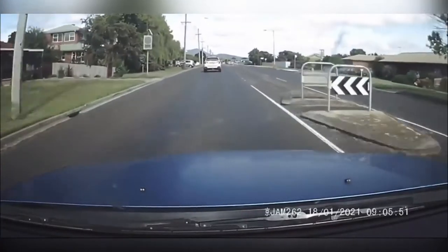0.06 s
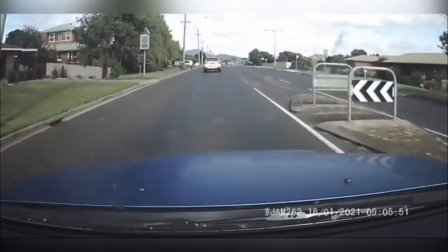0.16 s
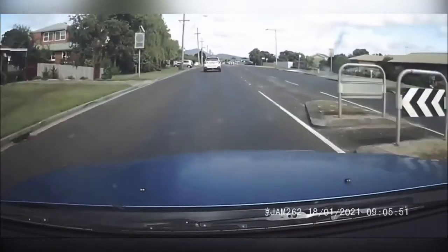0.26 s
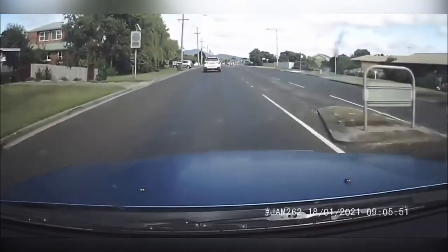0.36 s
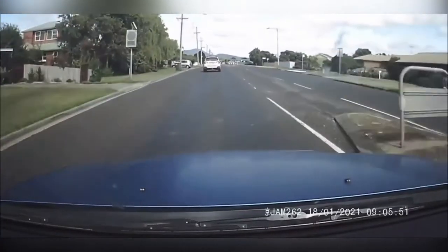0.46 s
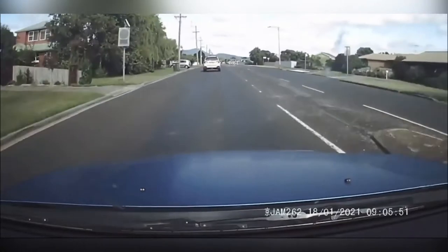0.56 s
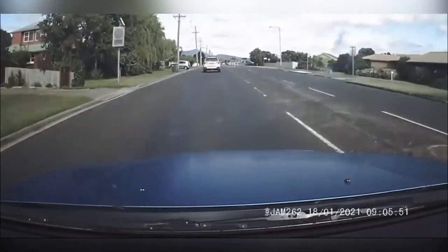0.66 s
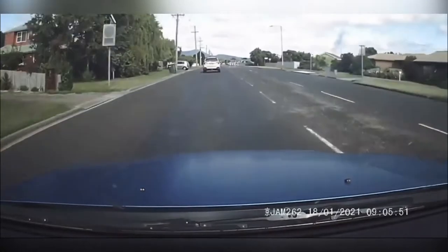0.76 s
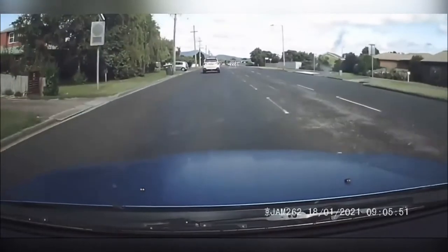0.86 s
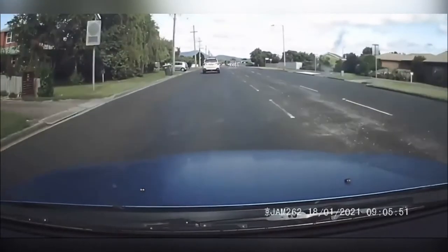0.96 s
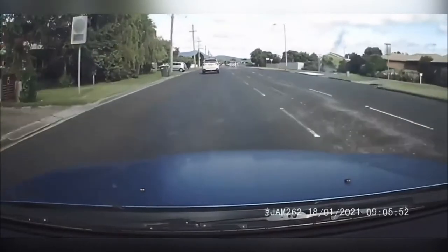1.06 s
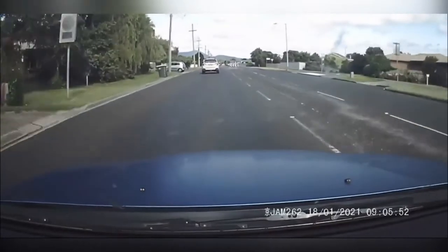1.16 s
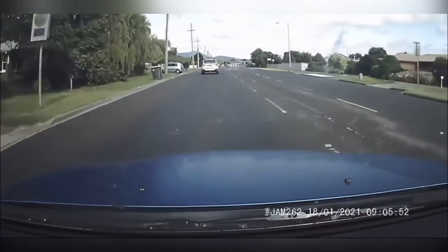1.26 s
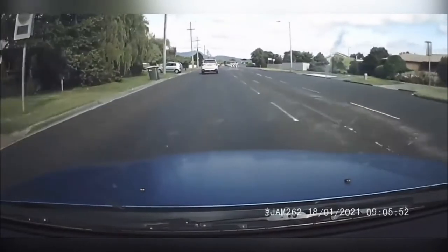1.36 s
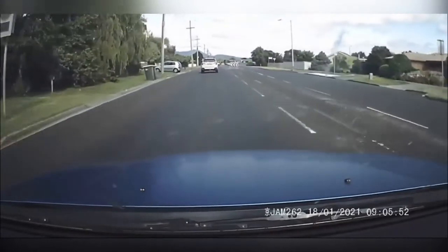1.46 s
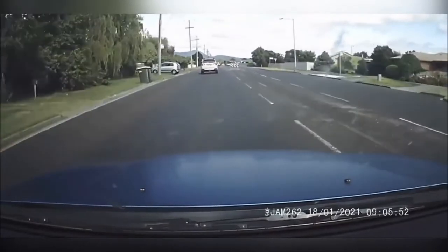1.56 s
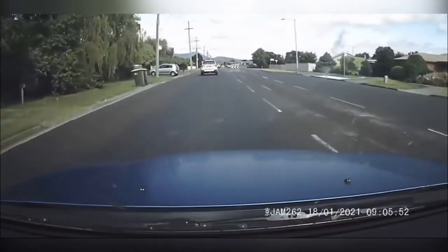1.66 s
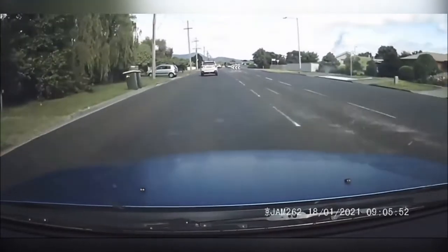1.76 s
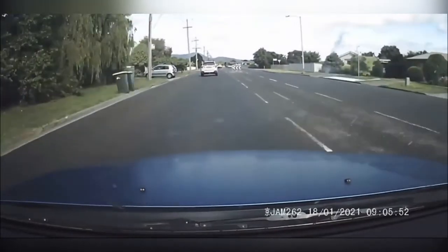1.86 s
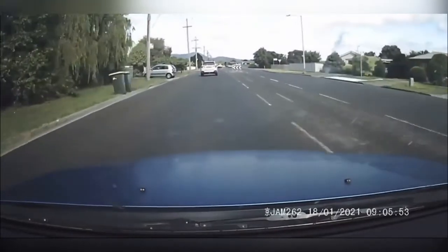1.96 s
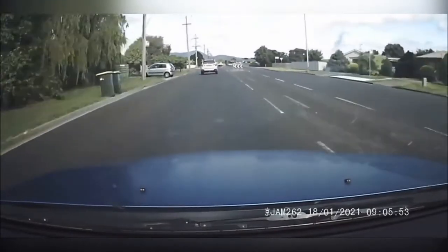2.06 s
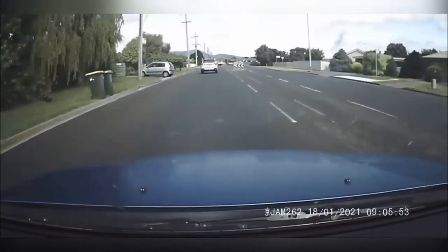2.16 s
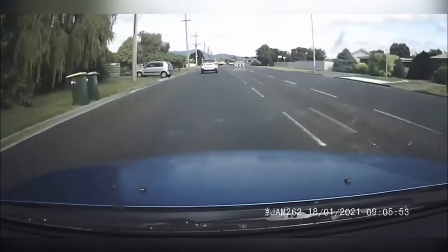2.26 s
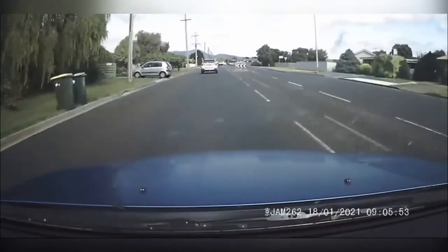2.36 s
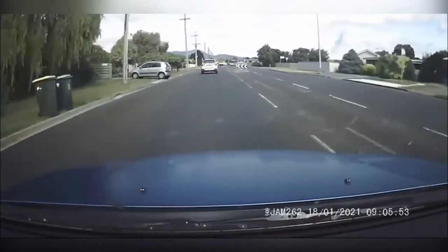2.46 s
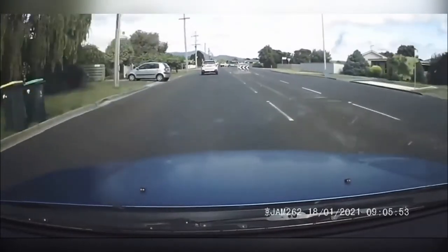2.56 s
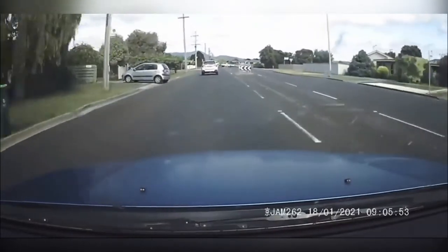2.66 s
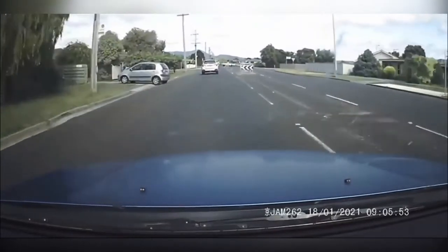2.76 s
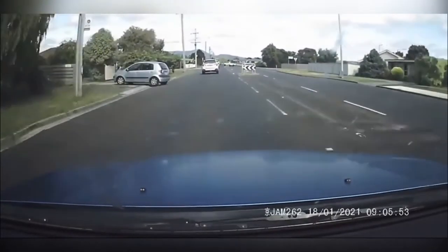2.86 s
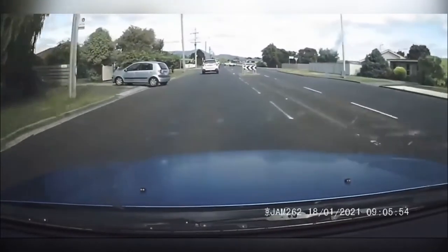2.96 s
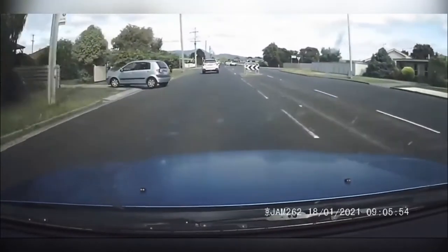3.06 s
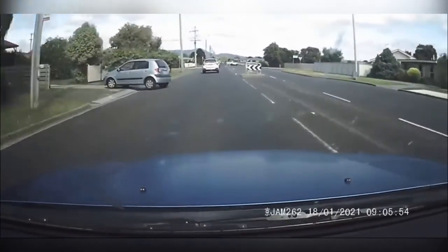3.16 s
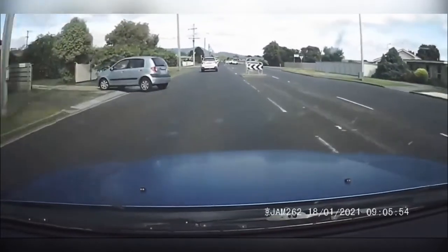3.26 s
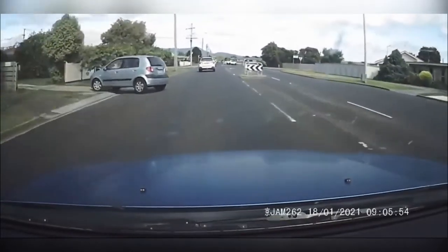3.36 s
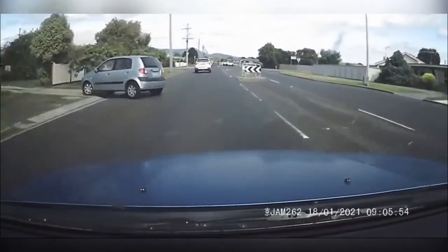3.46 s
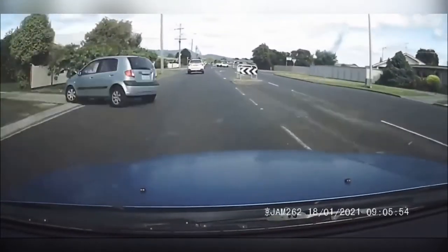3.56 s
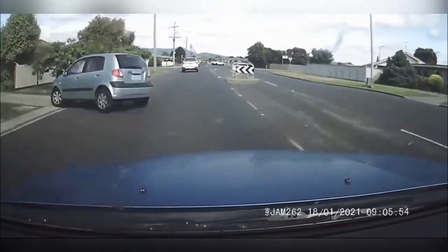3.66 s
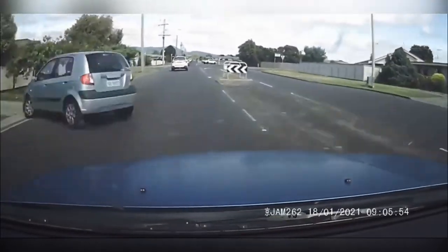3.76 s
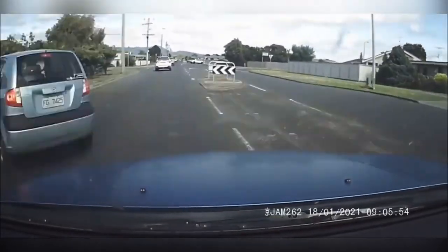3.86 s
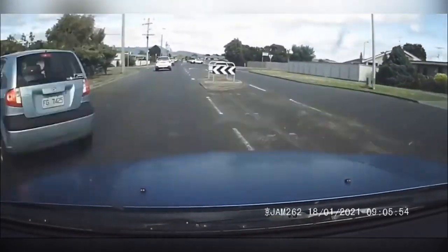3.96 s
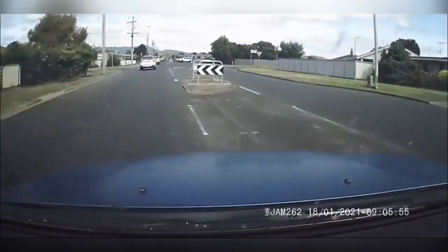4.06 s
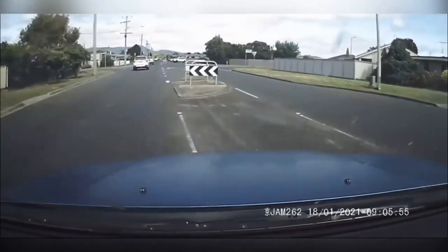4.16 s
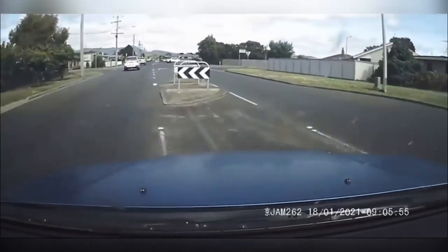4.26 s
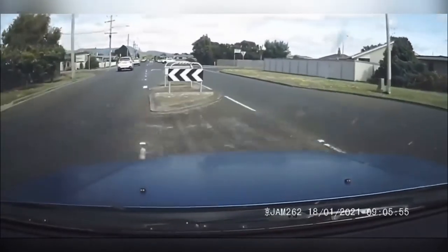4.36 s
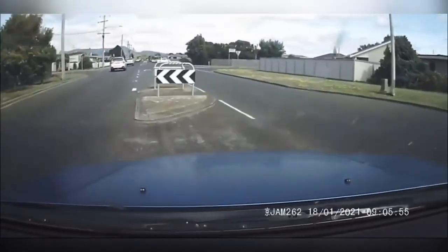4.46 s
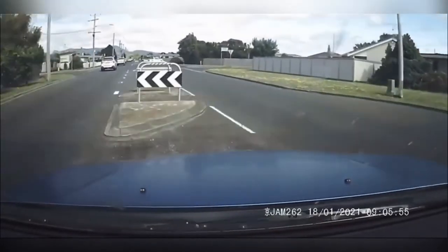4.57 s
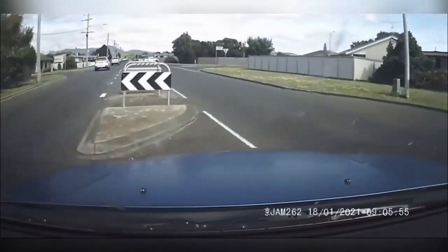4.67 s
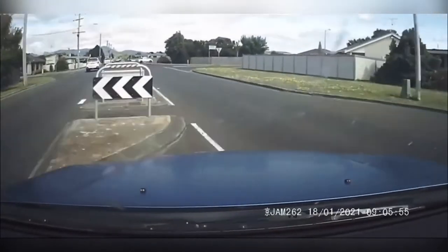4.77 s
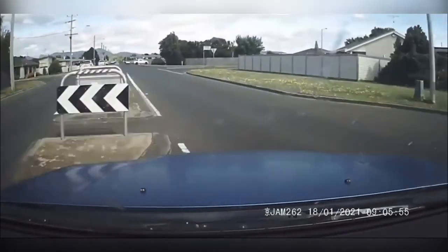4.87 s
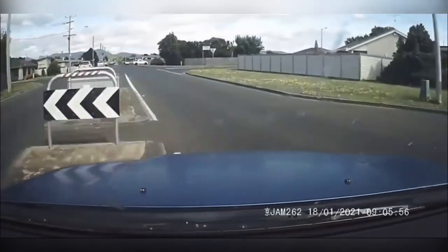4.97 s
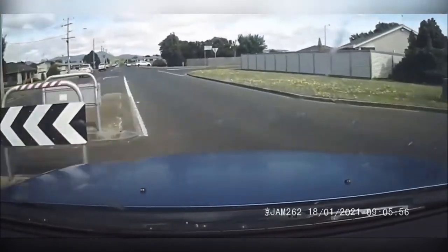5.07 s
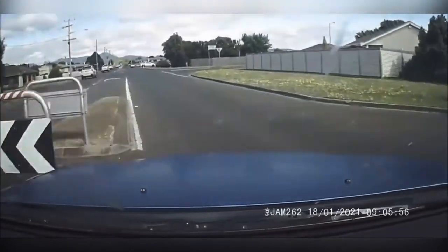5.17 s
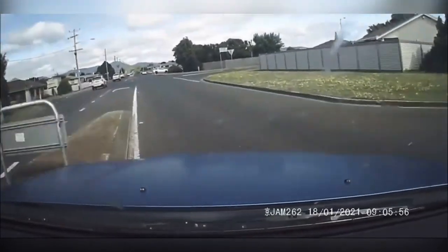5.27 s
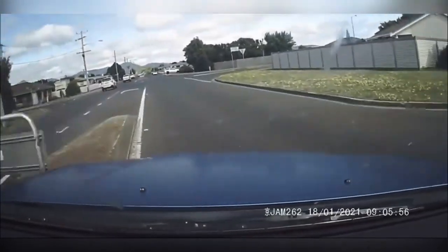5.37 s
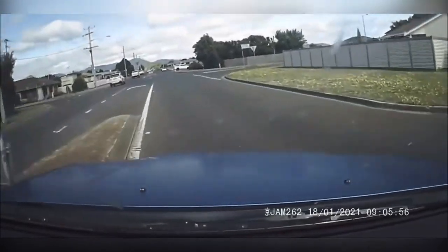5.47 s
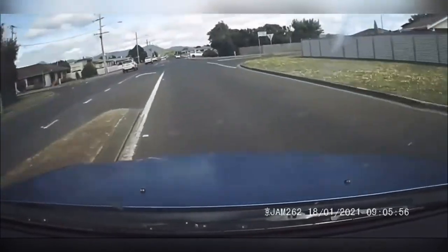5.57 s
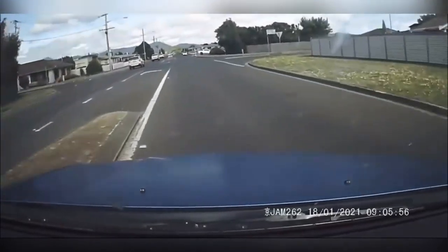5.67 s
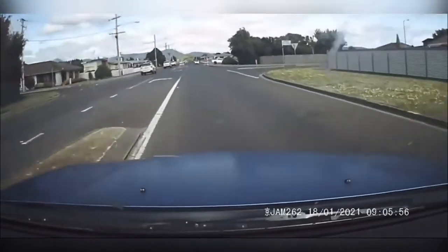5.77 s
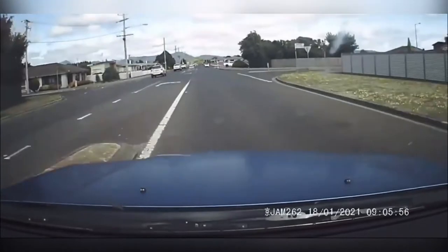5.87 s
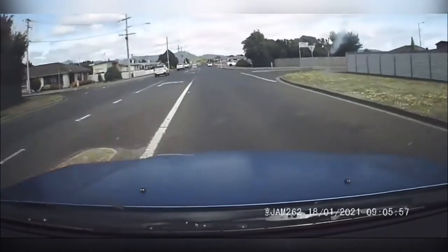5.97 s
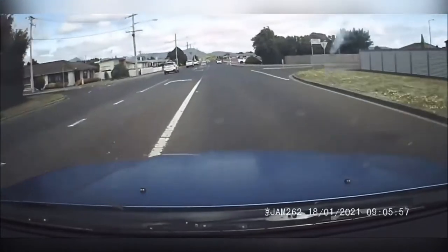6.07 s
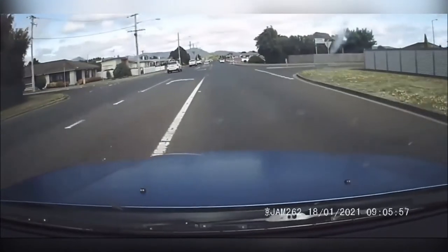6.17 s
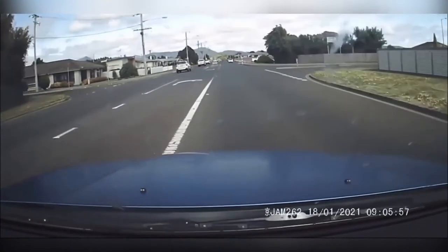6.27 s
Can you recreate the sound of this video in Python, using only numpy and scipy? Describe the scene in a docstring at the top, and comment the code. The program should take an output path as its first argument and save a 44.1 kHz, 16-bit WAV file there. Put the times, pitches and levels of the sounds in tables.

```python
"""Inside a car on a town road, heard by a small windscreen microphone that the bass overloads.
The engine is a stack of wavering sines over body boom (noise in broad low modes) and tyre roar (noise bands).
Under hard braking the engine slows, anti-lock valves tick as struck modes and wheel jolts set the body bouncing.
Loose things slide, judder, knock and ping about the cabin; then the sound is muted for a third of a second."""
import sys
import numpy as np
from scipy import signal
from scipy.io import wavfile

SR = 44100
rng = np.random.default_rng(int(sys.argv[2]) if len(sys.argv) > 2 else 0)


def to_wav(s):
    """Save 16-bit WAV."""
    ch = np.atleast_2d(s).T  # columns
    pcm = np.round(np.clip(ch, -1, 1) * 32767)  # PCM
    wavfile.write(sys.argv[1], SR, pcm.astype(np.int16))


N = 278712

# ringing modes of the cabin trim: pitch_hz, level_db, t60_s
TRIM_MODES = [(226, -8, .07), (470, -5, .03), (598, -4, .025), (820, -2, .025), (980, -2, .022),
              (1220, -8, .02), (1480, -14, .015), (1900, -13, .012), (2200, -11, .012), (2600, -11, .012),
              (3100, -13, .012), (3900, -21, .008), (4800, -26, .006), (5700, -25, .006), (6500, -30, .005),
              (9500, -37, .004)]


def from_db(db):
    """Amplitude gain of a level in dB."""
    return 10 ** (np.asarray(db) / 20)


def rms_one(x):
    """The signal scaled to rms 1."""
    return x / np.sqrt(np.mean(x ** 2) + 1e-20)


def in_time(rows):
    """Draw each column after the time column as a line with one value per sample."""
    s, *columns = np.transpose(rows)
    return [np.interp(np.arange(N) / SR, s, column) for column in columns]


def drift(rate_hz):
    """Slow random wandering of spread 1: noise through two equal low-pass poles, made at SR / 40."""
    r = np.exp(-2 * np.pi * rate_hz * 40 / SR)
    noise = rng.standard_normal(N // 40 + 2002)
    slow = signal.lfilter([1], [1, -2 * r, r * r], noise)[2000:]   # drop the filter's start-up
    return np.interp(np.arange(N) / 40, np.arange(len(slow)), rms_one(slow))


def ring(clicks, hz, t60_s):
    """A damped mode: a unit click sets a sine of height 1 ringing."""
    r = from_db(-60 / (t60_s * SR))
    w = 2 * np.pi * hz / SR
    return signal.lfilter([0, np.sin(w)], [1, -2 * r * np.cos(w), r * r], clicks + 1e-18)


def struck(times_s, levels_db, lengths_s, tilts_db, modes, spread_db):
    """Each blow is a short dying rattle of contacts that strikes every mode with a strength of its own."""
    out, age = np.zeros(N), np.arange(2000)
    fade = np.exp(-age / (np.maximum(lengths_s, 1e-4)[:, None] * SR))
    rattles = rng.standard_normal((len(times_s), 2000)) * fade
    rattles = rattles / np.linalg.norm(rattles, axis=1, keepdims=True)
    rattles[:, 0] += 0.6   # the firm first touch beside the whole rattle
    chance_db = spread_db * rng.standard_normal((len(times_s), len(modes)))
    for k, (hz, mode_db, t60_s) in enumerate(modes):
        clicks = np.zeros(N + SR)
        tilt_db = tilts_db * np.log2(hz / 1000)   # tilts are in dB per octave
        gains = from_db(levels_db + mode_db + tilt_db + chance_db[:, k])
        for s, gain, rattle in zip(times_s, gains, rattles):
            clicks[round(s * SR) + age] += gain * rattle
        out += ring(clicks[:N], hz, t60_s)
    return out


def scraped(modes, contacts_per_s, tilt_db):
    """A dense uneven stream of clicks dealt among ringing modes; rms 1, tilt in dB per octave."""
    sizes = from_db(3.3 * np.minimum(rng.exponential(1, N), 4)) * rng.choice([-1, 1], N)
    clicks = sizes * (rng.random(N) < contacts_per_s / SR)
    dealt = rng.integers(0, len(modes), N)
    out = 0
    for k, (hz, mode_db, t60_s) in enumerate(modes):
        gain = from_db(mode_db + tilt_db * np.log2(hz / 1000))
        out = out + gain * ring(clicks * (dealt == k), hz, t60_s)
    return rms_one(out)


def boom():
    """Road unevenness shakes the broad low modes of suspension, body and cabin air; rms 1."""
    # low modes: pitch_hz, width_hz, level_db
    body_modes = [(14.415, 4.7, -1.5), (24.22, 5.15, -1), (45.43, 6.26, -4.5), (7.193, 6.86, -5),
                  (68.45, 29, -20)]
    out = np.zeros(N)
    for hz, width_hz, level_db in body_modes:
        r = np.exp(-np.pi * width_hz / SR)
        poles = [1, -2 * r * np.cos(2 * np.pi * hz / SR), r * r]
        shaken = signal.lfilter([1, 0, -1], poles, rng.standard_normal(N + SR))[SR:]
        shaken = signal.sosfilt(signal.butter(2, 1.566 * hz, fs=SR, output="sos"), shaken)
        out += from_db(level_db) * np.sqrt(width_hz) * rms_one(shaken)
    return rms_one(out)


def through_panels(x):
    """Resonances of panels and cabin air each lift their part of the spectrum."""
    # resonances: pitch_hz, width_hz, lift_db
    panel_modes = [(338.7, 58, 6.5), (575.7, 38, 4), (783, 72, 6), (1139, 280, 3.5), (2052, 160, 7),
                   (3186, 76, 12.5)]
    for hz, width_hz, lift_db in panel_modes:
        r = np.exp(-np.pi * width_hz / SR)
        zeros = np.array([1, 0, -1]) * (1 - r * r) / 2
        peak = signal.lfilter(zeros, [1, -2 * r * np.cos(2 * np.pi * hz / SR), r * r], x)
        x = x + (from_db(lift_db) - 1) * peak
    return x


def roar(patchy_db=3.5):
    """Third-octave bands of tyre noise through the floor that swell together and flicker alone."""
    # spectrum of the roar before the panels: pitch_hz, relative density level_db
    roar_spectrum = [(60, 5), (130, 12), (220, 1), (290, 2), (340, -5), (450, -3.5), (760, -11),
                     (1100, -10.5), (1600, -55), (2200, -22.5), (2800, -41.5), (3150, -40), (3600, -43),
                     (4000, -59), (4400, -49.5), (5500, -58.5), (11000, -63)]
    table_hz, table_db = np.transpose(roar_spectrum)
    edges_hz = 55 * 2 ** np.arange(0, 7.8, 1 / 3)
    together = drift(6.0)
    white = rng.standard_normal((2, N))   # neighbouring bands use different noise
    out = 0
    for k, (low, high) in enumerate(zip(edges_hz, edges_hz[1:])):
        band = signal.sosfilt(signal.butter(2, [low, high], "band", fs=SR, output="sos"), white[k % 2])
        level_db = np.interp(np.log(low * high) / 2, np.log(table_hz), table_db)
        flicker_db = patchy_db * (0.27 * together + 0.72 * drift(16.0))
        out = out + from_db(level_db + flicker_db) * band
    out = through_panels(out)
    middle = signal.sosfilt(signal.butter(4, [250, 1400], "band", fs=SR, output="sos"), out)
    return out / np.std(middle)   # the middle of the roar has rms 1


def engine():
    """Sines on the orders of the engine cycle, each wavering a little; the mix shifts under engine braking."""
    # orders: multiple of the cycle rate, pulling level_db, engine-braking level_db
    orders = [(3, -20, -18), (4, 0, 0), (5, -5, -14), (6, -16, -14), (7, -18, -11), (8, -17, -14),
              (9, -19, -19), (10, -20, -22), (11, -26, -21), (12, -28, -29), (15, -28, -32)]
    # level of the whole engine, 0 dB in the orders being this: time_s, level_db
    engine_level = [(0, -15.8), (3.6, -17), (3.95, -16.5), (4.1, -13), (4.25, -15), (4.47, -12), (4.6, -15),
                    (4.72, -21), (4.88, -14), (5.3, -13.5), (5.42, -17), (5.55, -17), (5.9, -16)]
    t, (engine_db,) = np.arange(N) / SR, in_time(engine_level)
    slowed_s = np.maximum(t - 3.66, 0)
    cycle_hz = 22.05 + 0.05 * t   # cruising, gaining slightly
    cycle_hz = cycle_hz - 3.9 * slowed_s - 0.35 * slowed_s ** 2   # brakes bite harder as the car slows
    lift_off_s, lift_length_s = 3.5, 0.45   # the throttle closes
    braking = np.clip((t - lift_off_s) / lift_length_s, 0, 1)
    cycle_hz = cycle_hz + 0.15 * braking * drift(5.0)   # speed wobbles under braking
    turn = 2 * np.pi * np.cumsum(cycle_hz) / SR
    out = np.zeros(N)
    for k, pull_db, brake_db in orders:
        waver_db = (1.0 + 1.5 * braking) * drift(4.0)   # more uneven under braking
        level_db = pull_db + braking * (brake_db - pull_db) + waver_db
        out += from_db(level_db) * np.sin(k * turn + 2 * np.pi * rng.random())
    return np.sqrt(2) * from_db(engine_db) * out


def knocks():
    """Loose things knock on the trim: each blow is a rattle of contacts ringing its modes."""
    # blows: time_s, level_db, rattle decay_s, brightness tilt_db per octave
    blows = [(2.496, -22, 0.016, -4.5), (5.3055, -28, 0.0023, 10), (5.322, -19, 0.02, -10),
             (5.351, -22, 0.0062, 0), (5.391, -14, 0.0064, 7), (5.474, -25.5, 0.0037, 2),
             (5.528, -20.5, 0.0058, -2), (5.553, -32.5, 0.0054, 5.5), (5.576, -18, 0.0031, -6),
             (5.61, -16, 0.0033, 2), (5.6141, -2.5, 0.00071, 2), (5.622, -3, 0.0012, -4.5),
             (5.629, -10.5, 0.0055, 2), (5.635, -13, 0.013, 1.5), (5.679, -25, 0.0023, -5.5),
             (5.711, -28, 0.0032, 7), (5.722, -20, .003, 0), (5.728, -15, 0.0046, -6.5),
             (5.769, -28, 0.003, 0.5), (5.7751, -4.5, 0.0018, 0.5), (5.7804, -9.5, 0.0031, -1),
             (5.814, -22.5, 0.005, -4), (5.83, -25, 0.0031, -9), (5.85, -7.5, 0.0066, -5),
             (5.867, -27, 0.0027, -7), (5.878, -11, 0.008, -4.5), (5.886, -11.5, 0.0041, -1),
             (5.898, -25, 0.0037, -9.5), (5.907, -33, 0.0064, -2)]
    s, level_db, length_s, tilt_db = np.transpose(blows)
    return struck(s, level_db, length_s, tilt_db, TRIM_MODES, spread_db=1.5)


def valves():
    """Each solenoid tick rings the brake block and leaves a duller, longer shudder; pump and pads buzz below."""
    # anti-lock valve ticks, in runs about 23 ms apart: time_s, level_db
    ticks_at = [(3.3575, -33), (3.4424, -30), (3.526, -37), (3.538, -33), (3.5592, -25), (3.5801, -23),
                (3.6051, -22), (3.626, -23), (3.6505, -21), (3.68, -33), (3.7173, -19), (3.7647, -28),
                (3.7877, -22), (3.8121, -25), (3.8356, -22), (3.8825, -36), (3.9995, -27), (4.0477, -34),
                (4.139, -30), (4.188, -36), (4.24, -35), (4.2758, -29), (4.2917, -25), (4.3162, -26),
                (4.3361, -26), (4.3596, -22), (4.384, -24), (4.4105, -30), (4.46, -32), (4.4828, -23),
                (4.5057, -25), (4.5292, -22), (4.5516, -21), (4.5736, -27), (4.5926, -27), (4.617, -22),
                (4.6389, -21), (4.6624, -16), (4.6853, -19), (4.7078, -18), (4.7322, -20), (4.7552, -25),
                (4.8325, -39), (4.8445, -36), (4.8789, -35), (4.9183, -36)]
    # buzz of brake pump and pads: time_s, level_db
    pump_level = [(3.0, -81), (3.4, -48), (3.6, -62), (3.99, -46), (4.25, -61), (4.5, -46), (4.75, -54),
                  (4.95, -44.5), (5.15, -63), (5.3, -55.5), (5.9, -36)]
    # ringing modes of the brake block: pitch_hz, level_db, t60_s
    block_modes = [(705, -5, .02), (1000, -8, .014), (1300, -17, .008), (1930, -7, .015), (2030, -6, .012),
                   (2360, -3, .011), (2650, -4, .011), (3000, -19, .007), (3640, -12, .009),
                   (4390, -12, .013), (5640, -16, .008), (6200, -27, .014), (6710, -25, .005),
                   (8450, -32, .005), (10600, -33, .005)]
    (s, db), (pump_db,) = np.transpose(ticks_at), in_time(pump_level)
    each = np.ones(len(s))
    tick_tilt_db, shudder_tilt_db = -5.5, -6   # per octave
    # taking off one octave of tilt leaves a tick's level unchanged at 2 kHz
    ticks = struck(s, db - tick_tilt_db, 0.0024 * each, tick_tilt_db * each, block_modes, spread_db=1.5)
    shudders = struck(s, db - 9, 0.007 * each, shudder_tilt_db * each, block_modes, spread_db=4.0)
    buzz = from_db(pump_db + 1.3 * drift(16.0)) * scraped(block_modes, 5600.0, 0.3)
    return ticks + shudders + buzz


def jolts():
    """Wheels jolted by the road push through the suspension and set the body bouncing."""
    # pushes: time_s, height, bounce pitch_hz, t60_s
    pushes = [(3.573, 1.05, 21.5, 1.3), (5.725, -.9, 3.5, .8), (5.739, -2.4, 20.2, 1.2)]
    return sum(ring(height * (np.arange(N) == round(s * SR)), hz, t60_s) for s, height, hz, t60_s in pushes)


def sliding():
    """Things rub along the trim: each slide builds up and fades, the loudest one setting the brightness."""
    # slides: loudest moment time_s, level_db, build_s, brightness tilt_db per octave
    slides = [(5.31, -27.5, 0.077, -7), (5.36, -21.5, 0.079, 1.5), (5.4, -15.5, 0.15, -0.5),
              (5.60, -32, 0.18, 5.5), (5.64, -15, 0.1, 2), (5.73, -23, 0.31, 3), (5.82, -26, 0.1, 2),
              (5.88, -21, 0.1, -4.5), (5.93, -42.5, 0.19, -4)]
    s, db, build_s, tilt_db = np.array(slides).T[:, :, None]
    age = np.arange(N) / SR - s
    rise_db, fade_db_per_s = 46, 476   # rise over one build-up time; fade after the loudest moment
    level_db = db + np.where(age < 0, rise_db * age / build_s, -fade_db_per_s * age)
    brightness_db = tilt_db[level_db.argmax(axis=0), 0]
    return from_db(level_db.max(axis=0)) * scraped(TRIM_MODES, 3200.0, brightness_db)


def pings():
    """Contacts that ring one note, rising within a few cycles and dying away."""
    # notes: start_s, level_db, pitch_hz, t60_s
    notes = [(5.3015, -24, 3150, .03), (5.3064, -21, 5700, .012), (5.3077, -21, 2000, .012),
             (5.3135, -30, 5200, .012), (5.3185, -32, 5600, .03), (5.611, -12, 226, .16),
             (5.879, -22, 3050, .03)]
    out = np.zeros(N)
    for s, db, hz, t60_s in notes:
        age = np.maximum(np.arange(N) / SR - s, 0)
        rise = np.minimum(age * hz / 3, 1)   # three cycles long
        out += from_db(db - 60 * age / t60_s) * rise * np.sin(2 * np.pi * hz * age)
    return out


def judder():
    """A hollow thing sticks and slips over the trim at an unsteady rate: each slip is one push into its body."""
    # course of the skid: time_s, slips per s, level_db
    skid = [(5.322, 330, -47), (5.335, 325, -21), (5.352, 345, -16.5), (5.362, 430, -17.5),
            (5.372, 445, -11.5), (5.381, 350, -26.5), (5.389, 337, -11.5), (5.4, 373, -12.5),
            (5.415, 347, -14), (5.424, 360, -27), (5.444, 384, -21.5), (5.462, 370, -31),
            (5.49, 410, -44.5)]
    # ringing modes of the hollow body: pitch_hz, level_db, t60_s
    hollow_modes = [(360, 0, .025), (720, -2, .03), (1070, -3, .03), (1400, -10, .015), (1770, -12, .02),
                    (2440, -14, .01), (2900, -10, .01), (3300, -14, .008)]
    per_s, level_db = in_time(skid)
    at = np.flatnonzero(np.diff(np.floor(np.cumsum(per_s) / SR)))
    late, size = rng.standard_normal((len(at), 2)).T
    shift = (0.05 * late * SR / per_s[at]).astype(int)   # spread 5 % of the time between slips
    slips, t = np.zeros(N + SR), np.arange(N) / SR
    slips[np.maximum(at + shift, 0)] = from_db(2.5 * size)   # sizes spread by 2.5 dB
    # a slip is not a sharp click
    slips = signal.sosfilt(signal.butter(2, 3470, fs=SR, output="sos"), slips[:N])
    body = rms_one(sum(from_db(db) * ring(slips, hz, t60_s) for hz, db, t60_s in hollow_modes))
    return from_db(level_db) * body * ((t > skid[0][0]) & (t < skid[-1][0]))


def loose_things():
    """Small things slide, knock and ping on the trim while a hollow one judders."""
    return sliding() + judder() + knocks() + pings()


def scene():
    """All sources meet at the one microphone."""
    # road noise: time_s, body boom level_db, tyre roar level_db
    road_level = [(0, -9.5, -28), (.5, -6.5, -29), (1.5, -8.5, -30.5), (2.3, -8, -28.5), (3.0, -7, -31.5),
                  (3.5, -8, -26.5), (3.58, -4, -26), (3.78, -11, -30), (3.85, -6.5, -29), (4.43, -8, -27.5),
                  (5.19, -7.5, -31.5), (5.65, -5, -26), (5.72, -5.5, -27), (5.94, -3.5, -20),
                  (6.3, -14, -39)]
    boom_db, roar_db = in_time(road_level)
    road = from_db(boom_db) * boom() + from_db(roar_db) * roar() + jolts()
    return (road + engine() + valves() + loose_things())[None]


def overloaded_capsule(x):
    """The capsule saturates sooner on one side; its coupling capacitor then lets the flattened tops sag."""
    top, bottom, knee = 1.2, 0.8, 5.0
    room = np.where(x > 0, top, bottom)
    x = x / (1 + np.abs(x / room) ** knee) ** (1 / knee)
    return signal.sosfilt(signal.butter(1, 6.5, "high", fs=SR, output="sos"), x)


def stepped_limiter(x):
    """At uneven moments the gain moves one coarse step towards what the peaks ask for, with a small click."""
    limit_db, slope, step_db = -7, 0.5, 0.7
    release_db_per_s, makeup_db, updates_per_s = 64, 1.5, 400.0
    fall_db = release_db_per_s * np.arange(N) / SR
    peak_db = 20 * np.log10(np.abs(x[0]) + 1e-9)
    level_db = np.maximum.accumulate(peak_db + fall_db) - fall_db   # instant rise, steady fall
    wanted = np.round(slope * np.maximum(level_db - limit_db, 0) / step_db)
    moves, steps_down = np.zeros(N), 0
    for i in np.flatnonzero(rng.random(N) < updates_per_s / SR):
        moves[i] = np.sign(wanted[i] - steps_down)
        steps_down += moves[i]
    return x * from_db(makeup_db - step_db * np.cumsum(moves))


def record(dry):
    """Capsule, limiter and converter clip shape the sound; hiss, a treble cut, the mute and a last cut follow."""
    # the mute: start_s, end_s
    mute = (5.94557, 6.3119)
    x = np.clip(stepped_limiter(overloaded_capsule(dry)), -0.97, 0.97)
    x = x + from_db(-65) * rng.standard_normal(N)   # converter hiss
    # each treble cut reaches its full depth (22 dB, then 70 dB) just above the named pitch
    first_cut_hz, last_cut_hz = 11500, 16000
    x = signal.sosfilt(signal.cheby2(8, 22, 1.06 * first_cut_hz, fs=SR, output="sos"), x)
    t = np.arange(N) / SR
    x = x * ((t < mute[0]) | (t > mute[1]))
    return signal.sosfilt(signal.cheby2(12, 70, 1.04 * last_cut_hz, fs=SR, output="sos"), x)


dry = scene()
out = record(dry)
to_wav(out)
```